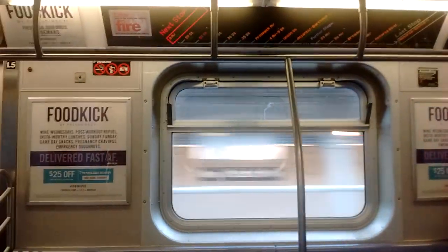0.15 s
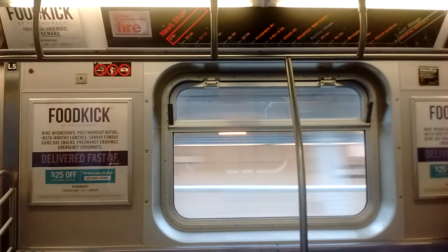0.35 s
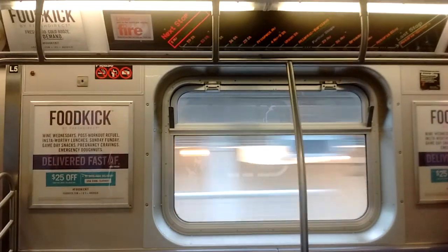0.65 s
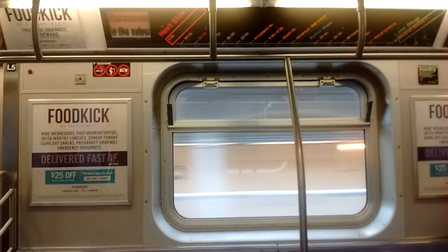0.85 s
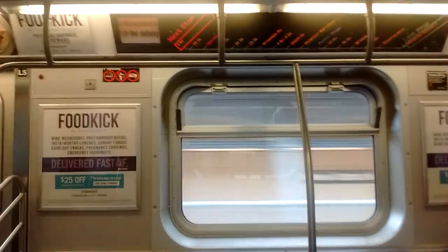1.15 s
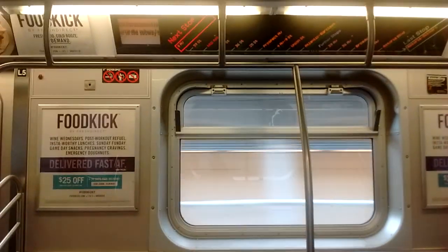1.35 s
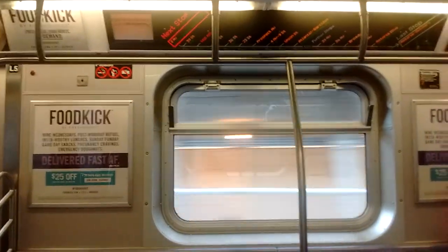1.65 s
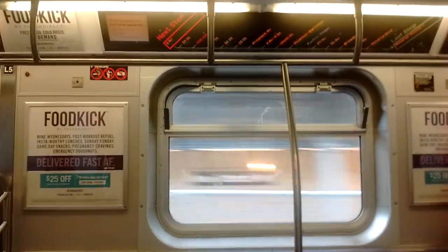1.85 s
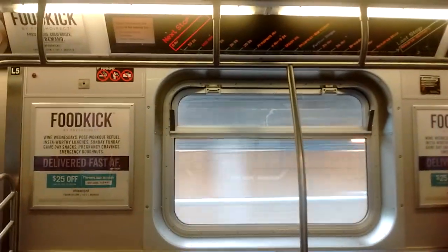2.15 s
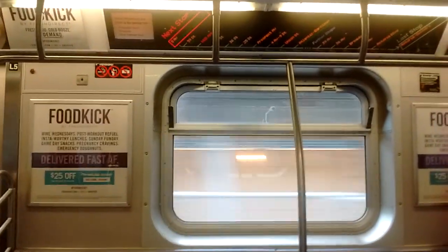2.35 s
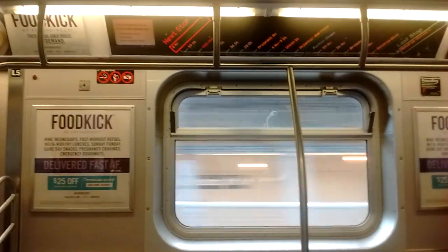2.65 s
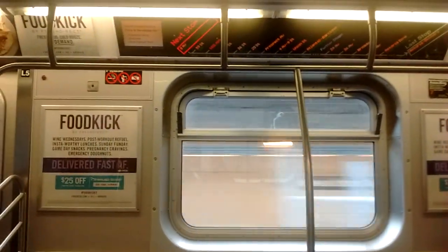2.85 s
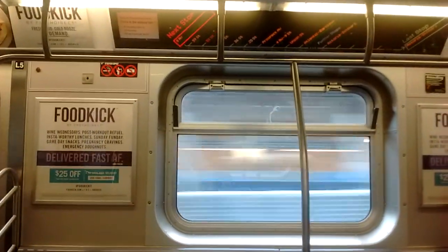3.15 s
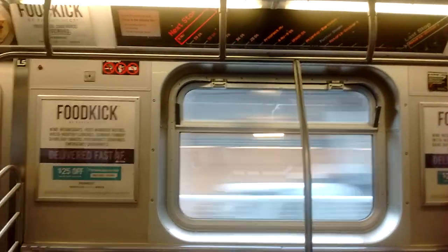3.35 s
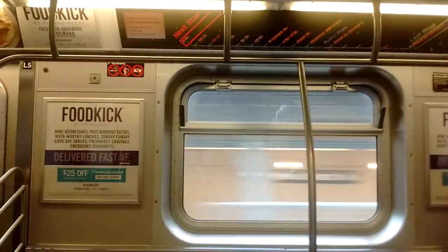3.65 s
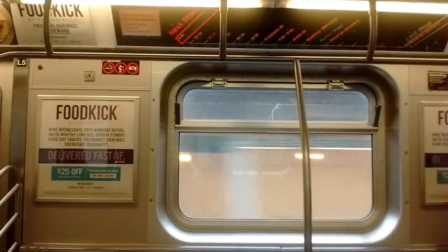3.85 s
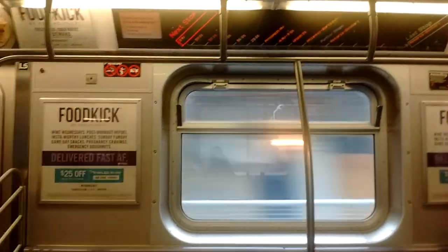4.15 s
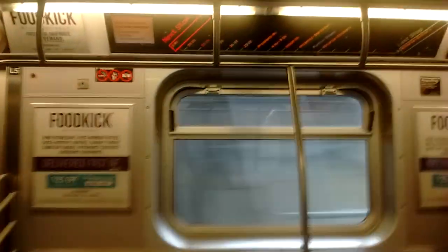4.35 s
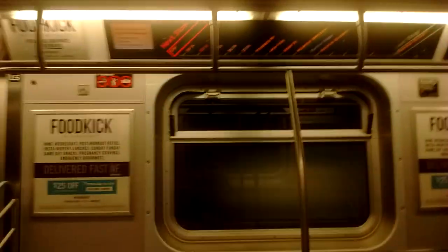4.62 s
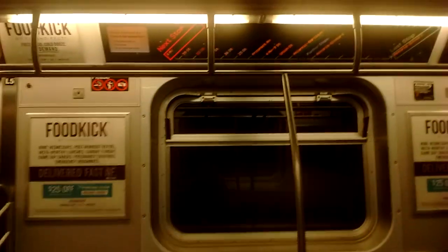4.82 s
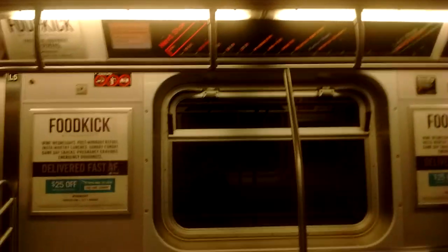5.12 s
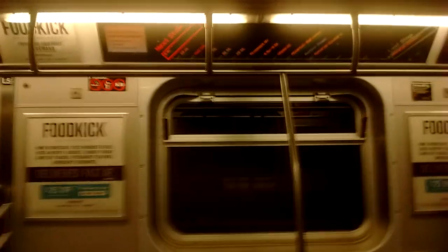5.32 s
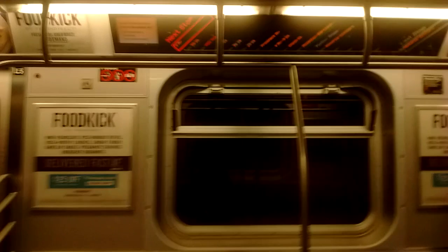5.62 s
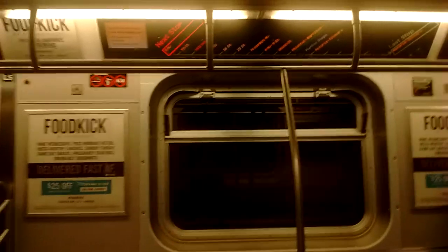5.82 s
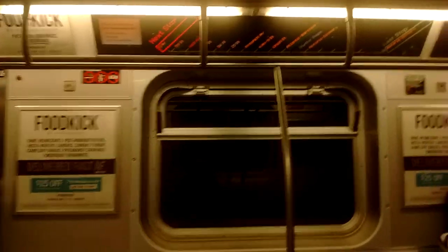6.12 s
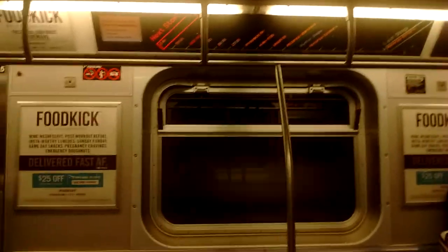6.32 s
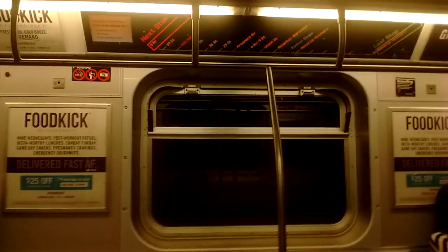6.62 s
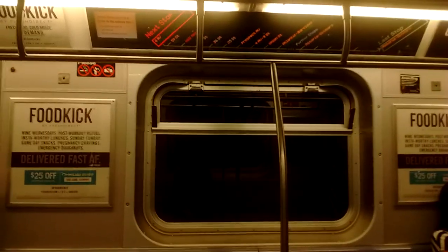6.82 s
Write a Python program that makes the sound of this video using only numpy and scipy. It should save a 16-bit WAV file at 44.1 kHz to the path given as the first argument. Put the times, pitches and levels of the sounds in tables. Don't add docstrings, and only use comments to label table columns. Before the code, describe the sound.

Inside a speeding subway car, a deep steady rumble and rolling wheel roar with surging motor hum, brief squeaks, then howling wheels and knocks in a tunnel.

```python
import sys
import numpy as np
from scipy import signal
from scipy.fft import rfft, irfft, next_fast_len
from scipy.io import wavfile

SR = 44100
rng = np.random.default_rng(int(sys.argv[2]) if len(sys.argv) > 2 else 0)


def generate_wav(signal):
    frames = np.transpose(np.atleast_2d(signal))
    scaled = np.clip(frames, -1, 1) * 32767
    pcm = np.round(scaled).astype(np.int16)
    wavfile.write(sys.argv[1], SR, pcm)


def how_loud(loudness_db):
    steps = np.asarray(loudness_db, float) / 20
    return 10 ** steps


N = 307818
T = np.arange(N) / SR
SIZE = next_fast_len(N + 4096)
HZ = np.arange(SIZE // 2 + 1) * SR / SIZE + 1e-3

# pitch_hz, level_db (per Hz)
RUMBLE_TONE = [(8, -35), (20, -13), (32, -13), (58, -11.5), (76, -7.5), (88, -3), (140, -1.5), (200, -6),
               (280, -7.5), (420, -15.5), (550, -31)]
# pitch_hz, width_hz, boost_db
BODY_RINGING = [(42, 15, 8.5), (87.5, 11, 5), (426, 6.9, -5.5), (6500, 900, 3)]
# peak_s, swell_db
LURCHES = [(.15, 5.5), (.72, 3.5), (1.45, 2), (2.23, 1), (2.76, 3.5), (3.2, 4), (3.75, 5.5), (4.15, 0.5),
           (4.4, 0), (4.95, 0), (5.5, -1), (6.22, 3)]
# pitch_hz, level_db (per Hz)
ROLLING_TONE = [(180, -3.5), (300, 8.5), (450, 9), (600, 6), (800, 1.5), (1000, 1), (1500, -3.5),
                (2000, -4), (2500, -10.5), (3300, -17.5)]
# time_s, level_db
WHEEL_LOAD = [(0, -30), (.4, -31), (.7, -28.5), (.8, -32), (1.4, -30), (1.9, -29), (2.5, -30), (3.2, -29.5),
              (3.7, -31.5), (3.85, -31.5), (4.5, -28.5), (5.0, -29.5), (5.5, -27), (5.8, -28), (6.3, -27),
              (6.7, -29), (6.98, -27)]
# pitch_hz, level_db (per Hz)
RAIL_TONE = [(1700, -25), (2300, -3), (2800, -2), (3300, -5), (4200, -15)]
# peak_s, swell_db
ROUGH_RAIL = [(2.5, 7), (2.76, 3.5), (3.8, 8), (4.1, 5), (4.5, 1.5), (4.68, 6), (4.85, 6.5), (5.05, 4),
              (5.52, 6), (5.7, 2), (5.95, 7), (6.15, 1), (6.38, 6)]
# start_s, level_db, pitch_hz, fade_60db_s, rise_s
KNOCKS = [(.68, -39, 2700, .2, .02), (3.74, -19.5, 950, 0.52, 0.037), (3.79, -21, 1320, 0.98, .06),
          (3.82, -23, 190, .6, .04), (4.07, -23, 190, .4, .03), (4.19, -22.5, 1880, .2, .02),
          (5.38, -31, 1970, 0.8, 0.034), (5.49, -20, 1010, 0.2, 0.021), (5.765, -19, 1840, 0.058, 0.0034),
          (5.815, -22, 1920, 0.093, .004), (5.864, -22, 2380, 0.078, 0.0032),
          (6.11, -22.5, 1600, .3, 0.0078), (6.4, -28, 1100, 0.17, 0.0091), (6.84, -24, 2370, .15, .008)]
# pitch_hz, level_db (per Hz)
HISS_TONE = [(2800, -11), (3500, 0), (4000, 0), (4600, -5), (5300, -14), (6300, -16.5), (7500, -24.5)]
# time_s, level_db
DRAUGHT = [(0, -41), (.4, -40.5), (.8, -40.5), (1.3, -39), (1.9, -40.5), (2.55, -40.5), (3.2, -40.5),
           (3.65, -39.5), (3.85, -37), (4.25, -38), (4.5, -37.5), (4.95, -43), (5.05, -42.5), (5.7, -43),
           (6.1, -41.5), (6.7, -43), (6.98, -45)]
# pitch_hz, level_db (per Hz)
GUST_TONE = [(5500, -8), (6800, -3), (8000, -3.5), (9700, -9.5), (10500, -14), (12000, -21), (15600, -40)]
# peak_s, swell_db, hold_s
PUFFS = [(.47, 5.5, .03), (.81, 9, 0.086), (1.03, 6, 0.11), (2.54, 3.5, .05), (3.17, 2.5, .04),
         (4.15, 4.5, 0.11), (4.74, 3, .04), (4.88, 3.5, 0.074), (5.82, 4, 0.061), (6.08, 4.5, .05),
         (6.84, 4, 0.074)]
# peak_s, swell_db, hold_s
MOTOR_SURGES = [
    (.13, 11, 0.09),
    (.72, 13, 0.045),
    (.93, 13, .05),
    (1.2, 13, 0.19),
    (1.75, 12.5, 0.17),
    (2.22, 14.5, 0.16),
    (2.6, 10.5, .15),
]
# start_s,
# length_s, pitch_hz, width_hz, level_db
SQUEAKS = [(0.445, 0.13, 3540, 200, -33), (.45, .12, 9000, 2400, -63), (0.796, 0.12, 3920, 520, -31.5),
           (.8, 0.26, 11500, 4200, -55), (1.02, .26, 10300, 3500, -62), (4.73, .08, 11000, 2500, -62),
           (1.15, .15, 3550, 150, -42), (1.657, 0.13, 4370, 9, -39.5), (2.237, 0.13, 3800, 520, -36.5),
           (3.95, 0.64, 4580, 700, -46), (4.1, 0.2, 11500, 4000, -65), (5.82, .1, 10200, 800, -68),
           (6.094, .06, 8000, 300, -50)]
# pitch_hz, level_db (per Hz)
WALL_TONE = [(4600, -20), (5200, -2), (5700, -1), (6100, -20)]
# deepest_s, depth_db
WALL_GAPS = [(.97, 1), (1.06, 1), (1.56, 3), (2.05, 4.5), (2.61, 3.5), (2.97, 3.5), (3.25, 3), (3.44, 0),
             (4.98, 2.5), (5.3, 0), (5.74, 2), (6.55, 0.5)]
# pitch_hz, boost_db (over the first)
PORT_TILT = [(1200, 0), (2500, 3), (4000, 7.5), (5500, 3.5), (7000, 5), (9000, 1), (15000, -7)]
# pitch_hz, lag_half_turns
CROSS_LAG = [(0, 0), (1600, 1), (3210, 2), (4800, 3), (6370, 4), (8000, 5), (9350, 6), (10300, 7),
             (11350, 8), (12550, 9), (13850, 10), (15050, 11)]
# pitch_hz, gain (plain factor)
CROSS_GAIN = [(200, 0.85), (1600, 0.73), (3200, 0.65), (4800, 0.67), (6400, 0.59), (8000, 0.48),
              (9350, 0.62), (10300, 0.31), (11350, 0.13), (12550, 0.33), (15000, .6)]
# pitch_hz, level_db (per Hz)
MIC_HISS = [(8000, -16), (10500, -3), (13000, -8), (14000, -14), (14900, -3), (15600, -7)]


def rumble():
    level_db = -37 + swells(LURCHES, rise_s=0.1, fade_s=0.1)
    return how_loud(level_db + 18.0) * rush(RUMBLE_TONE, patchy_db=1.5, flicker_hz=5.3, count=5)


def rolling(load_db, gap_db):
    level_db = load_db - 0.93 * gap_db + 6.0
    return how_loud(level_db) * rush(ROLLING_TONE, patchy_db=0.72, flicker_hz=11.0, count=6)


def rail(load_db, tunnel, gap_db, puff_db):
    level_db = -41.5 + 0.36 * (load_db - load_db.mean()) + 3.5 * tunnel
    level_db = level_db - 1.04 * gap_db + 0.13 * puff_db
    return how_loud(level_db + 3.5) * rush(RAIL_TONE, patchy_db=1.04, flicker_hz=16.0, count=2)


def howl(tunnel):
    level_db = -36.5 + 2 * tunnel + swells(ROUGH_RAIL, rise_s=0.085, fade_s=0.085)
    pitch_hz = 795.2 + 18.0 * drift(2.5)
    phase = 2 * np.pi * np.cumsum(pitch_hz) / SR
    both = drift(72.0) * np.cos(phase) + drift(72.0) * np.sin(phase)
    apart = drift(72.0) * np.cos(phase) + drift(72.0) * np.sin(phase)
    return how_loud(level_db) * rms_one(both + 0.68 * apart * np.array([[1], [-1]]))


def knocks(white):
    out = np.zeros((2, N))
    for start_s, level_db, pitch_hz, fade_60db_s, rise_s in KNOCKS:
        span = slice(round(start_s * SR), min(N, round((start_s + 0.5) * SR)))
        age_s = T[span] - T[span][0]
        burst = rms_one(band_pass(white[:, span], pitch_hz * 0.61, pitch_hz * 1.28))
        rise = np.clip(age_s / rise_s, 0, 1)
        out[:, span] += how_loud(level_db - 60 * age_s / fade_60db_s) * rise * burst
    return out


def hiss(draught_db, tunnel, gap_db, puff_db):
    level_db = draught_db - 1.5 * tunnel - 0.93 * gap_db + 0.25 * puff_db
    return how_loud(level_db + 2.4) * rush(HISS_TONE, patchy_db=0.83, flicker_hz=8.3, count=3)


def gusts(draught_db, tunnel, gap_db, puff_db):
    level_db = -58 + 0.8 * (draught_db - draught_db.mean()) + 1.6 * tunnel
    level_db = level_db - 0.9 * gap_db + puff_db
    return how_loud(level_db + 3.0) * rush(GUST_TONE, patchy_db=0.73, flicker_hz=12.0, count=3)


def motor():
    surge_db = np.minimum(swells(MOTOR_SURGES, rise_s=0.11, fade_s=0.12), 17)
    level_db = -31 + surge_db + 0.82 * drift(4.0)
    pitch_hz = 140.7 + 1.0 * drift(2.3)
    return how_loud(level_db) * np.sin(2 * np.pi * np.cumsum(pitch_hz) / SR)


def squeaks(white):
    out = np.zeros((2, N))
    stutter = how_loud(2.0 * drift(25.0))
    run_in = SR // 4
    for start_s, length_s, pitch_hz, width_hz, level_db in SQUEAKS:
        span = slice(round(start_s * SR), round((start_s + length_s) * SR))
        noise = white[:, span.start - run_in:span.stop]
        whistle = band_pass(noise, pitch_hz - width_hz / 2, pitch_hz + width_hz / 2)[:, run_in:]
        shape_s = start_s + length_s * np.array([0, 0.22, 0.5, 1])
        shape = np.interp(T[span], shape_s, [0.15, 0.97, 0.73, 0.24])
        if width_hz > 100:
            shape = shape * stutter[span]
        out[:, span] += how_loud(level_db) * shape * rms_one(whistle)
    return out


def wall_whoosh(white, tunnel, gap_db):
    inside = (HZ > WALL_TONE[0][0]) * (HZ < WALL_TONE[-1][0])
    whoosh = irfft(rfft(white, SIZE) * how_loud(at_hz(WALL_TONE, HZ)) * inside, SIZE)[:, :N]
    return how_loud(-54 - gap_db) * tunnel * rms_one(whoosh)


def rush(tone, patchy_db, flicker_hz, count):
    body_db = sum(db / (1 + (2 * (HZ - hz) / width) ** 2) for hz, width, db in BODY_RINGING)
    low, high = tone[0][0], tone[-1][0]
    field = diffuse() * how_loud(at_hz(tone, HZ) + body_db) * (HZ > low) * (HZ < high)
    place = np.log(HZ / low) / np.log(high / low) * (count - 1)
    out, shared = 0, drift(flicker_hz)
    for k in range(count):
        share = np.clip(1 - abs(place - k), 0, 1)
        band = irfft(field * share, SIZE)[:, :N]
        out = out + band * how_loud(patchy_db * (0.88 * shared + drift(flicker_hz)))
    return rms_one(out)


def diffuse():
    port_gap_m, stray, sound_speed_m_s = 0.1, 0.051, 343
    alike = (1 - stray) * np.sinc(2 * HZ * port_gap_m / sound_speed_m_s)
    both, apart = rfft(rng.standard_normal((2, SIZE)))
    return np.sqrt(1 + alike) * both + np.sqrt(1 - alike) * apart * np.array([[1], [-1]])


def drift(rate_hz):
    r = np.exp(-80 * np.pi * rate_hz / SR)
    noise = rng.standard_normal(N // 40 + 2002)
    slow = signal.lfilter([1], [1, -2 * r, r * r], noise)[2000:]
    return np.interp(np.arange(N) / 40, np.arange(len(slow)), rms_one(slow))


def swells(rows, rise_s, fade_s):
    out = np.zeros(N)
    for peak_s, swell_db, *hold_s in rows:
        rise = np.clip((T - peak_s) / rise_s + 1, 0, 1)
        fade = np.exp(-np.clip(T - peak_s - sum(hold_s), 0, None) / fade_s)
        out += swell_db * rise * fade
    return out


def band_pass(x, low_hz, high_hz):
    sos = signal.butter(2, [low_hz, high_hz], "band", fs=SR, output="sos")
    return signal.sosfilt(sos, x)


def rms_one(x):
    return x / np.sqrt(np.mean(x ** 2) + 1e-20)


def in_time(rows):
    return np.interp(T, *np.transpose(rows))


def at_hz(points, hz):
    table_hz, values = np.transpose(points)
    return np.interp(np.log(hz), np.log(table_hz), values)


def scene():
    load_db, draught_db = in_time(WHEEL_LOAD), in_time(DRAUGHT)
    tunnel = np.clip((T - 3.5) / (5 - 3.5), 0, 1)
    gap_db = swells(WALL_GAPS, rise_s=0.022, fade_s=0.11)
    puff_db = swells(PUFFS, rise_s=0.04, fade_s=0.096)
    white = irfft(diffuse(), SIZE)[:, :N]
    wheels = rolling(load_db, gap_db) + rail(load_db, tunnel, gap_db, puff_db)
    wheels = wheels + howl(tunnel) + knocks(white)
    air = hiss(draught_db, tunnel, gap_db, puff_db) + gusts(draught_db, tunnel, gap_db, puff_db)
    return rumble() + wheels + air + motor() + squeaks(white) + wall_whoosh(white, tunnel, gap_db)


def low_pass(x):
    return signal.sosfilt(signal.butter(12, 15390, fs=SR, output="sos"), x)


def record(dry):
    tilt = how_loud(at_hz(PORT_TILT, HZ) / 2)
    ports = rfft(dry, SIZE) * np.array([1 / tilt, tilt])
    lag = np.pi * np.interp(HZ, *np.transpose(CROSS_LAG))
    late = at_hz(CROSS_GAIN, HZ) * np.exp(-1j * lag)
    mixed = irfft(ports + ports[::-1] * late, SIZE)[:, :N] * [[1], [-how_loud(-1.42)]]
    hiss_shape = how_loud(at_hz(MIC_HISS, HZ)) * (HZ > MIC_HISS[0][0])
    mic_hiss = irfft(rfft(rng.standard_normal((2, SIZE))) * hiss_shape, SIZE)[:, :N]
    mixed = mixed + how_loud(-70) * rms_one(mic_hiss)
    rounded = 1.25 * np.tanh(mixed / 1.25)
    return low_pass(rounded)


dry = scene()
out = record(dry)
generate_wav(out)
```